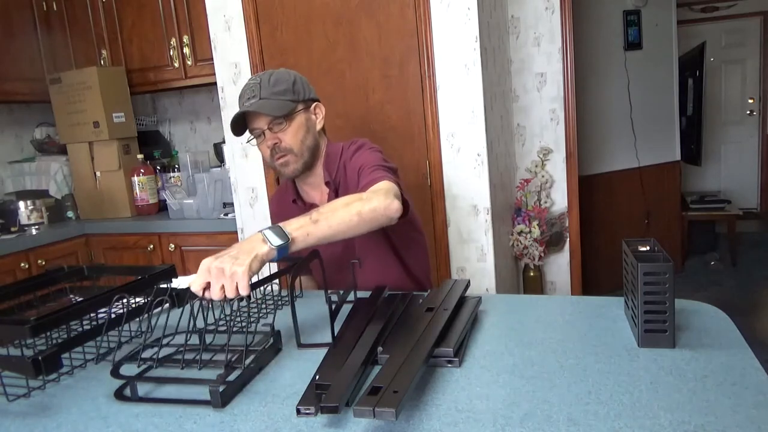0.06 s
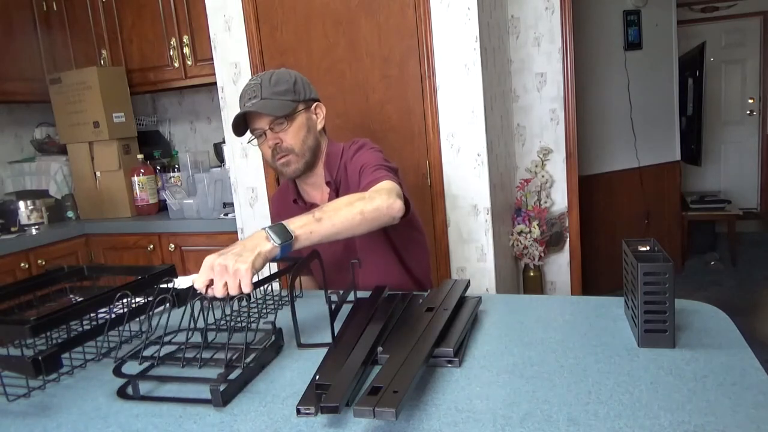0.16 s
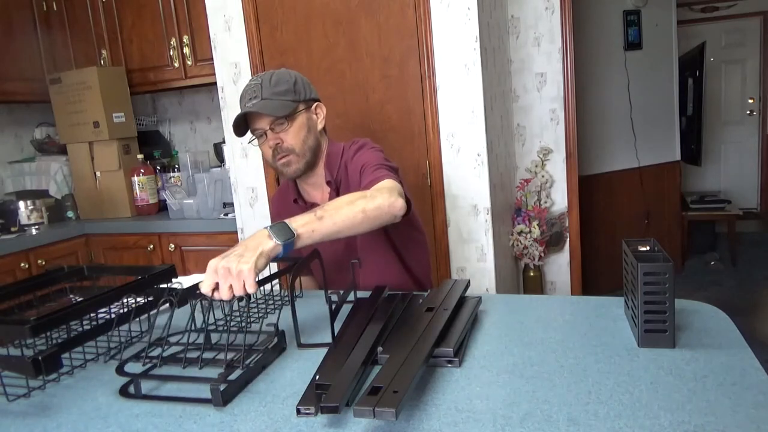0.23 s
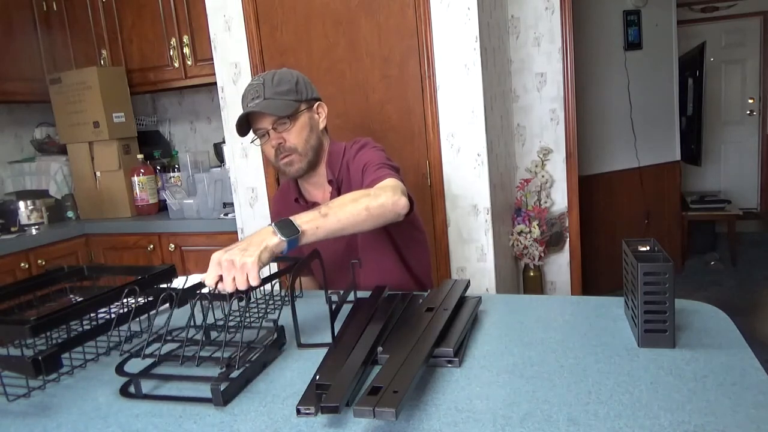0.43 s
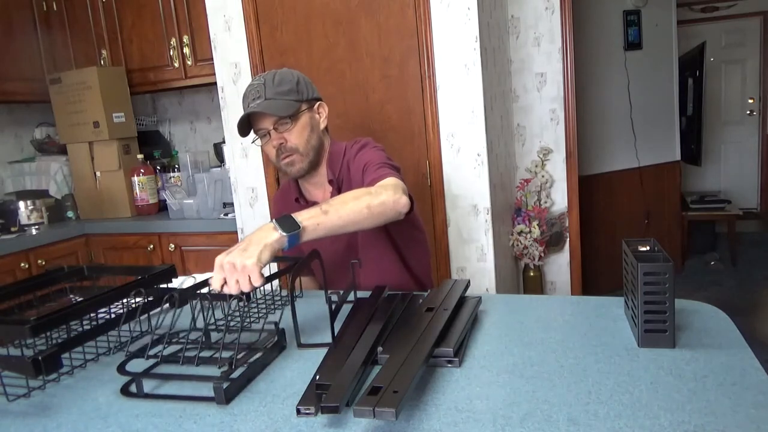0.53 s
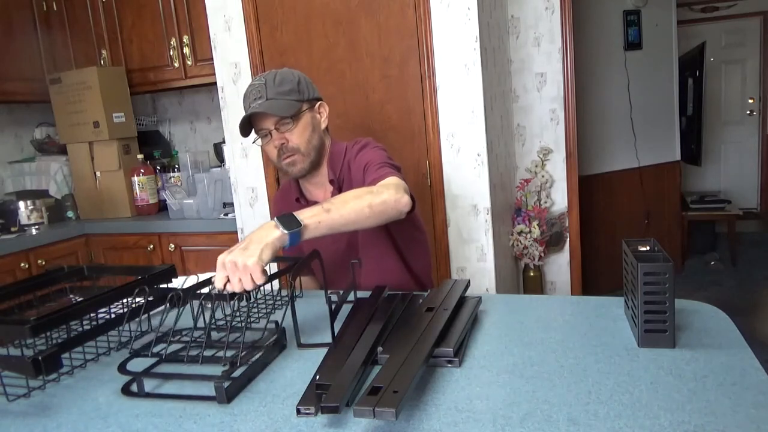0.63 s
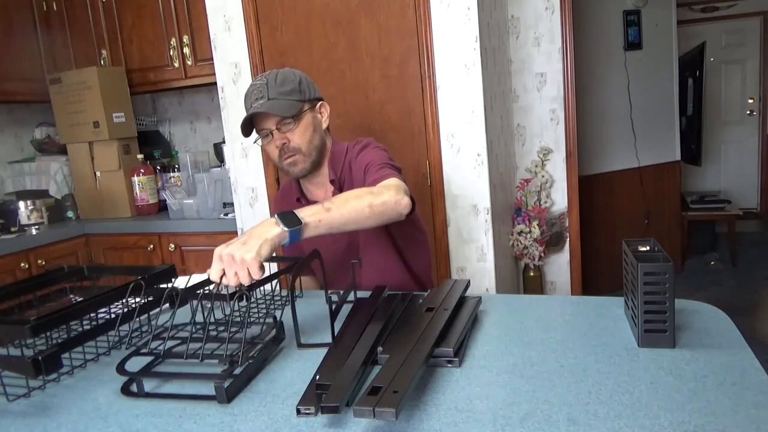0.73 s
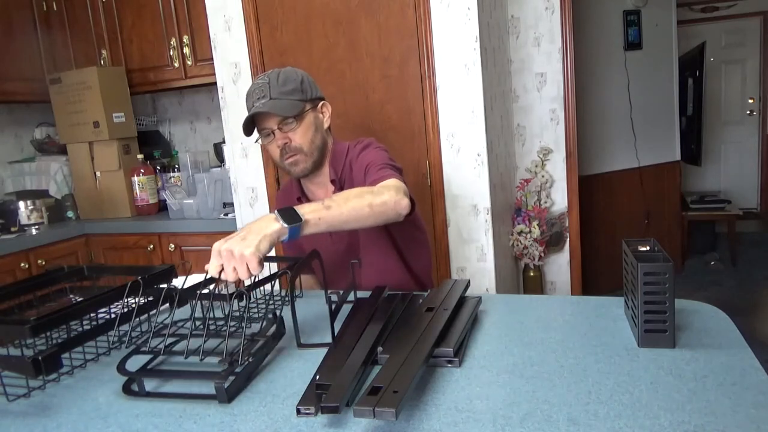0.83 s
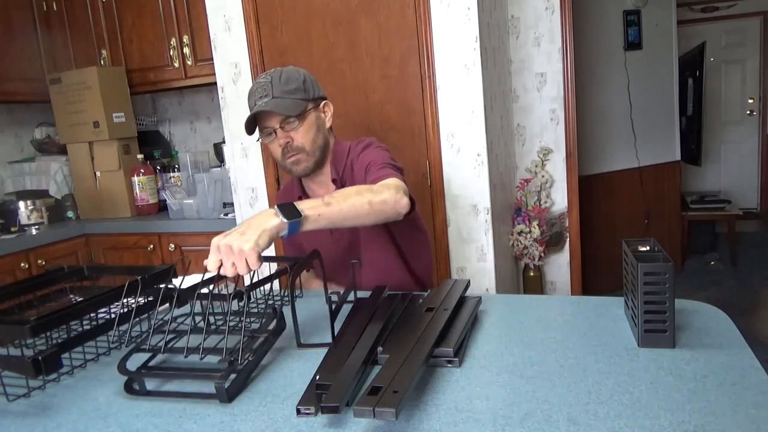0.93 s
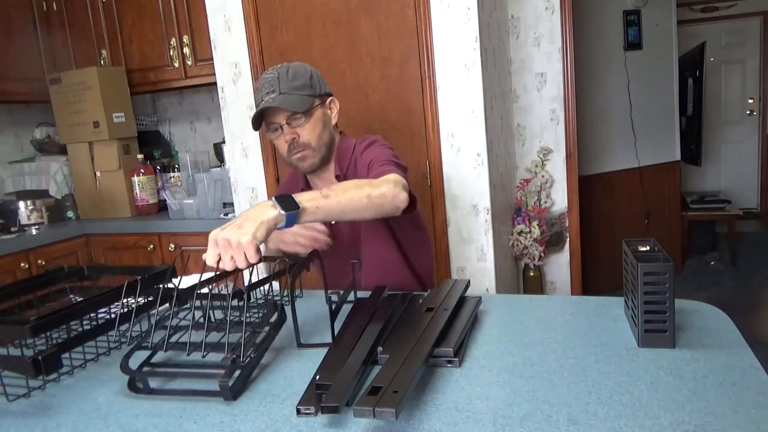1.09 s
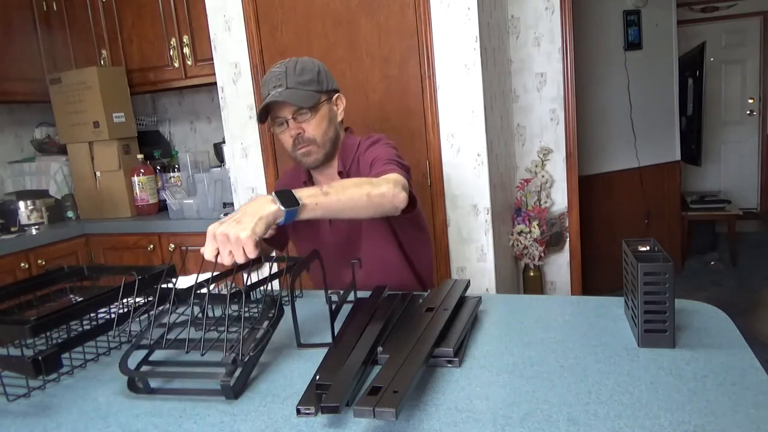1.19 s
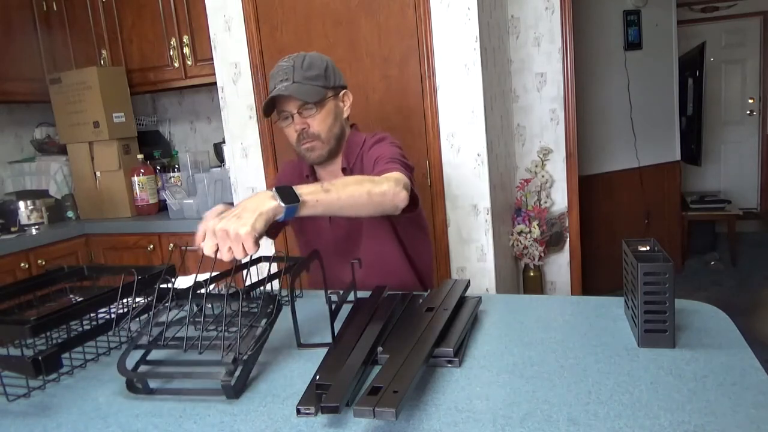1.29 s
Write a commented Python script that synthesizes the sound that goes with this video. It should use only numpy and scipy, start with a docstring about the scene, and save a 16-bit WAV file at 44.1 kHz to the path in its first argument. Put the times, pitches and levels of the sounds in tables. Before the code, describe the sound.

A metal dish rack is shifted on a kitchen counter, giving two quick clatters of ringing bars and thin wires, followed by quieter scraping and small squeaks. The close stereo microphones catch short reflections and a faint room hush.

```python
"""A small, hard kitchen, with a stereo pair of microphones close to the counter.
A wire dish rack is shifted and clatters twice against its metal frame. Each clatter is a quick run
of contacts that ring the bars and many thin wires. Around the clatters the rack slides, squeaks
and settles softly. The counter and walls throw the sound back over a faint hush of room air."""
import sys
import numpy as np
from scipy import signal
from scipy.fft import rfft, irfft, next_fast_len
from scipy.io import wavfile

SR = 44100
rng = np.random.default_rng(int(sys.argv[2]) if len(sys.argv) > 2 else 0)


def generate_wav(signal):
    """Clip the signal to [-1, 1] and save it as 16-bit WAV at the path in sys.argv[1]."""
    frames = np.transpose(np.atleast_2d(signal))
    scaled = np.clip(frames, -1, 1) * 32767
    pcm = np.round(scaled).astype(np.int16)
    wavfile.write(sys.argv[1], SR, pcm)


N = 59535

# Room tone and its side channel: freq_hz, gain_db
HUSH_COLOUR = [(25, -16), (60, -17), (100, -14.5), (170, -5.5), (250, -5.5), (330, -1), (650, -0.5),
               (1100, -7), (2000, -13), (5000, -17.5), (10000, -18), (16000, -27.5)]
HUSH_SIDE = [(60, -26), (130, -20), (300, -14), (640, -12.5), (1400, -2), (3100, -1), (6800, -5.5),
             (10000, -18), (15000, -30)]
# Decay of the kitchen: freq_hz, t60_s
ROOM_DECAY = [(120, 0.47), (400, 0.66), (1000, .43), (2500, 0.36), (5000, .38), (9000, 0.24), (15000, 0.32)]
# Reflections in the side channel: freq_hz, gain_db
REFLECTION_SIDE = [(100, -65), (300, -20), (700, -13.5), (1500, -9.5), (3000, -7.5), (6000, -3.5),
                   (10000, -7.5), (13000, -23)]
# Balance of the microphone pair: freq_hz, left_minus_right_db
PAIR_BALANCE = [(100, -1), (3000, 0.6), (6000, -0.4), (9500, 3), (13000, -0.3)]
# Pushes along the counter, one curve each: time_s, level_db
SLIDE_STROKES = [
    [(0, -34.5), (.07, -49), (.13, -49.5), (.2, -46.5)],
    [(.39, -72), (.47, -44.5), (.52, -44)],
    [(.76, -51.5), (.82, -47), (.87, -45.5), (.94, -50), (1.0, -53.5), (1.15, -58.5), (1.34, -61)],
]
# Tone of the sliding: freq_hz, gain_db
SLIDE_TONE = [(60, -64), (160, -7.5), (350, -1), (800, 3), (1200, -1.5), (2200, -6.5), (4000, -20),
              (9000, -26.5), (16000, -47)]
# Wires that catch and sing as the rack slides: start_s, length_s, pitch_hz, level_db
WIRE_SQUEAKS = [(.07, 0.016, 2600, -49), (.13, .035, 2800, -58), (.14, 0.045, 1970, -48.5),
                (0.476, .045, 2460, -51), (0.486, 0.04, 2712, -40.5), (.82, 0.032, 345, -45.5),
                (.85, 0.21, 975, -51.5), (.85, 0.091, 780, -52.5), (.86, 0.052, 1648, -51.5),
                (0.847, 0.132, 3050, -62), (0.847, 0.11, 2724, -57), (0.853, 0.051, 4260, -57),
                (.925, 0.029, 4250, -60)]
# Colour of the thin wires, for rack and frame: freq_hz, gain_db
WIRE_COLOUR = {"rack": [(60, -50), (150, -16), (260, -17.5), (340, -7.5), (450, -12.5), (600, -1.5),
               (900, -4), (1300, -1), (1950, -3), (2500, -4.5), (3750, -4), (4650, -11.5), (7200, -9),
               (9000, -12.5), (10800, -10.5), (13000, -22.5), (16000, -33)], "frame": [(60, -67),
               (170, -13.5), (300, -14), (370, -6.5), (520, -9), (700, -5), (970, -6), (1250, -2.5),
               (1550, -3), (1900, -1), (2700, -3.5), (4500, -8), (6000, -13), (7750, -12), (9700, -9),
               (12000, -19.5), (16000, -35.5)]}
# Contrast between clusters of wire modes: freq_hz, spread_db
CLUSTER_CONTRAST = [(700, 1), (2000, 1), (5000, 4), (12000, 2.8)]
# Strongest bar modes, for rack and frame, with low counter modes near 160 and 340 Hz: pitch_hz, level_db
BAR_MODES = {"rack": [(165, -12), (715, -6.5), (780, -5.5), (1010, -2), (1090, -5), (1184, -1),
             (1408, -8.5), (1625, 0), (1918, -0.5), (3060, -7.5), (4285, -2), (5792, -13), (7138, -7),
             (10760, -1.5)], "frame": [(160, -16.5), (340, -14), (708, -2.5), (906, -3), (1394, -9),
             (1558, 1), (1875, -9.5), (1926, 1), (2057, -5), (2374, 0), (2713, -1.5), (3252, -15),
             (7305, 1), (9400, -24)]}
# Decay of the wires and of the bars: freq_hz, t60_s
WIRE_DECAY = [(150, 0.12), (700, .18), (2000, 0.19), (5000, 0.19), (10000, 0.16), (15000, 0.14)]
BAR_DECAY = [(160, 0.49), (1000, 0.34), (2000, 0.32), (4000, 0.24), (10000, 0.17)]
# Thud, knock, clang, ring and sizzle bands of a blow: centre_hz
BLOW_BANDS = [250, 900, 2000, 5000, 10000]
# Metal striking metal: start_s, part, thud_db, knock_db, clang_db, ring_db, sizzle_db
BLOWS = [(-0.03, "rack", -22.5, -23, -23.5, -37, -34.5), (0.2068, "rack", -13.5, -15, -10.5, -29, -27.5),
         (0.2183, "rack", -23.5, -30, -19, -20.5, -10), (0.2245, "rack", -20.5, -32, -16, -15, -24.5),
         (0.2385, "rack", -20, -15.5, -18, -21, -17.5), (0.2465, "rack", -17.5, -28, -22, -23, -22),
         (0.269, "rack", -29.5, -19, -20.5, -28.5, -23), (0.4812, "frame", -32, -31, -32.5, -33.5, -31.5),
         (0.5152, "frame", -37, -28, -35.5, -28.5, -18), (0.5195, "frame", -29, -29, -26, -31, -16.5),
         (0.5298, "frame", -23, -12, -14, -18.5, -14.5),
         (0.5352, "frame", -16.5, -14.5, -17.5, -14.5, -14.5),
         (0.5605, "frame", -16.5, -16, -16.5, -21, -15), (0.5705, "frame", -18, -13, -16.5, -31, -60),
         (0.5846, "frame", -24, -19, -17.5, -18, -13.5), (0.813, "frame", -50, -43, -46, -53, -64),
         (0.8505, "rack", -55, -43.5, -44, -44.5, -51)]

HUSH_DB = -57
ROOM_DB, ROOM_BUILD_S = -4.5, 0.0059
COUNTER_DB, COUNTER_FADE_S = -4, 0.0022
SLIDE_DB, SLIPS_PER_S, SLIP_SPREAD_DB, SLIDE_FADE_S = -4, 770, 3, 0.15
SLIDE_RING_DB, SLIDE_RING_S = -1, 0.026
SQUEAK_WIDTH_HZ = 9.1
WIRE_MODE_COUNT, WIRES_DB, WIRE_SPREAD_DB = 900, -2.5, 1.5
CLUSTER_HZ = 130.4  # wires of like length ring in clusters of this spacing
BARS_DB, CRACK_DB, CRACK_S = -16.5, -4.5, 0.0047
LOW_CUT_HZ, TOP_HZ = 110, 16300


def amp(db):
    """Decibels to gain."""
    return 10 ** (np.asarray(db) / 20)


def unit_rms(x):
    """Scales to rms 1."""
    return x / np.sqrt(np.mean(x ** 2) + 1e-20)


def read(points, hz):
    """Reads a table on a log-frequency axis."""
    freqs, values = np.transpose(points)
    return np.interp(np.log(hz + 1), np.log(freqs + 1), values)


def coloured(x, points):
    """Filters by a table of freq_hz, gain_db."""
    size = next_fast_len(2 * len(x))
    gain = amp(read(points, np.fft.rfftfreq(size, 1 / SR)))
    return irfft(rfft(x, size) * gain, size)[:len(x)]


def dying(x, t60s):
    """Lets every band of a steady sound die at its own speed."""
    t, hz, spectrum = np.arange(len(x)) / SR, np.fft.rfftfreq(len(x), 1 / SR), rfft(x)
    centres, times = np.transpose(t60s)
    out = np.zeros(len(x))
    for share, t60 in zip(np.eye(len(times)), times):
        band = irfft(spectrum * read(list(zip(centres, share)), hz), len(x))
        out += band * amp(-60 * t / t60)
    return out


def add(mix, start_s, sound):
    """Mixes a sound in; one that starts before zero loses its head."""
    at = round(start_s * SR)
    part, sound = mix[max(at, 0):], sound[max(-at, 0):]
    part[:len(sound)] += sound[:len(part)]


def hush():
    """Room tone: the steady air of the quiet kitchen."""
    return amp(HUSH_DB) * unit_rms(coloured(rng.standard_normal(N), HUSH_COLOUR))


def kitchen(x):
    """Dense reflections come back from cupboards and walls."""
    t = np.arange(SR) / SR
    taps = rng.choice([-1., 1.], SR) * (rng.random(SR) < 0.1)
    tail = dying(taps, ROOM_DECAY) * (1 - np.exp(-t / ROOM_BUILD_S))
    return amp(ROOM_DB) * signal.fftconvolve(x, tail / np.linalg.norm(tail))[:N]


def counter(x):
    """First bounces off the counter top, which reach the two microphones differently."""
    t = np.arange(2048) / SR
    taps = rng.standard_normal(len(t)) * np.exp(-t / COUNTER_FADE_S)
    return amp(COUNTER_DB) * signal.fftconvolve(x, taps / np.linalg.norm(taps))[:N]


def wire_modes():
    """Spectrum of many thin wires in 1 Hz bins: uneven lines that gather in clusters."""
    slots = np.arange(WIRE_MODE_COUNT) + rng.random(WIRE_MODE_COUNT)
    pitch_hz = (slots * TOP_HZ / WIRE_MODE_COUNT).astype(int)
    clusters = np.interp(pitch_hz / CLUSTER_HZ, np.arange(1024), rng.standard_normal(1024))
    strength = np.zeros(SR // 2 + 1)
    strength[pitch_hz] = amp(read(CLUSTER_CONTRAST, pitch_hz) * clusters)
    return strength


def wire_ring(modes):
    """One second of steady ringing, each wire mode stirred to a chance level and phase."""
    strength = modes * amp(WIRE_SPREAD_DB * rng.standard_normal(len(modes)))
    return irfft(strength * np.exp(2j * np.pi * rng.random(len(modes))))


def slide():
    """Tiny slips of the rack on the counter keep its wires ringing softly."""
    t = np.arange(N) / SR
    slips = (rng.random(N) < SLIPS_PER_S / SR) * rng.choice([-1, 1], N)
    slips = slips * amp(SLIP_SPREAD_DB * rng.standard_normal(N))
    ping = wire_ring(wire_modes()) * np.exp(-t[:SR] / SLIDE_RING_S)
    ring = signal.fftconvolve(slips, ping)[:N]
    scrape = coloured(unit_rms(slips) + amp(SLIDE_RING_DB) * unit_rms(ring), SLIDE_TONE)
    envelope = np.zeros(N)
    for stroke in SLIDE_STROKES:
        time_s, level_db = np.transpose(stroke)
        outside_s = abs(t - np.clip(t, time_s[0], time_s[-1]))
        envelope += amp(np.interp(t, time_s, level_db)) * np.exp(-outside_s / SLIDE_FADE_S)
    return amp(SLIDE_DB) * envelope * unit_rms(scrape)


def squeaks():
    """In each squeak, friction swells and drops one wavering wire mode."""
    out = np.zeros(N)
    phase_step = np.sqrt(2 * np.pi * SQUEAK_WIDTH_HZ / SR)
    for start_s, length_s, pitch_hz, level_db in WIRE_SQUEAKS:
        t = np.arange(0, length_s, 1 / SR)
        wander = phase_step * np.cumsum(rng.standard_normal(SR))[:len(t)]
        swell = amp(level_db) * np.sin(np.pi * t / length_s)
        add(out, start_s, swell * np.sin(2 * np.pi * pitch_hz * t + wander))
    return out


def contact(part, modes, bands_db):
    """One blow: a short crack with a haze of wire modes, and the ring of the bars and of the counter below
    them."""
    t = np.arange(SR) / SR
    force = list(zip(BLOW_BANDS, bands_db))
    wires, crack = (coloured(unit_rms(coloured(x, WIRE_COLOUR[part])), force)
                    for x in (wire_ring(modes), rng.standard_normal(SR)))
    haze = amp(WIRES_DB) * dying(wires, WIRE_DECAY) + amp(CRACK_DB) * crack * np.exp(-t / CRACK_S)
    bars = np.zeros(SR)
    for pitch_hz, level_db in BAR_MODES[part]:
        envelope = amp(level_db + read(force, pitch_hz) - 60 * t / read(BAR_DECAY, pitch_hz))
        bars += envelope * np.sin(2 * np.pi * (pitch_hz * t + rng.random()))
    return haze, amp(BARS_DB) * bars


def clatter():
    """Rack and frame strike together; each keeps its own wire modes from blow to blow."""
    modes = {part: wire_modes() for part in BAR_MODES}
    haze, bars = np.zeros((2, N))
    for start_s, part, *bands_db in BLOWS:
        wire_sound, bar_sound = contact(part, modes[part], bands_db)
        add(haze, start_s, wire_sound)
        add(bars, start_s, bar_sound)
    low_cut = signal.butter(3, LOW_CUT_HZ, "high", fs=SR, output="sos")
    return signal.sosfilt(low_cut, [haze, bars])  # cuts the low thump from the clatter


def scene():
    """The rack is close and centred between the microphones; reflections spread to the sides."""
    haze, bars = clatter()
    rustle = haze + slide()
    tones = bars + squeaks()
    direct = rustle + tones
    mid = direct + kitchen(rustle + amp(-8) * tones)
    side = coloured(kitchen(direct) + counter(direct), REFLECTION_SIDE)
    air, air_side = hush(), coloured(hush(), HUSH_SIDE)
    channels = []
    for sign in (1, -1):  # left, right
        balance = [(hz, sign * db / 2) for hz, db in PAIR_BALANCE]
        channels.append(coloured(mid + sign * side, balance) + air + sign * air_side)
    return np.array(channels)


def record(dry):
    """The recorder's band limit cuts the highest treble."""
    low_pass = signal.firwin(511, TOP_HZ, window=("kaiser", 9), fs=SR)
    return signal.oaconvolve(dry, low_pass[None], "same")


dry = scene()
out = record(dry)
generate_wav(out)
```